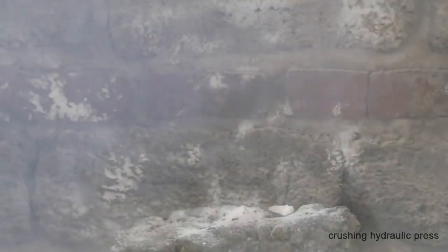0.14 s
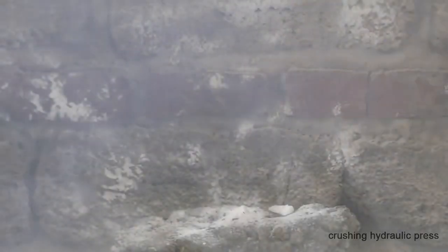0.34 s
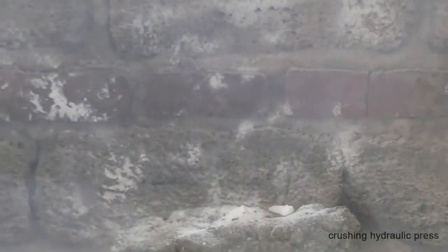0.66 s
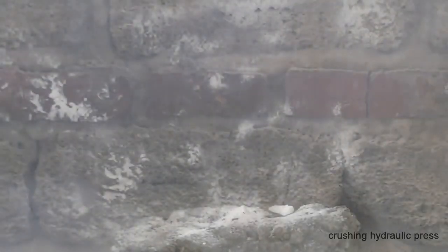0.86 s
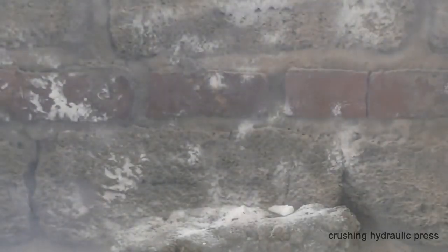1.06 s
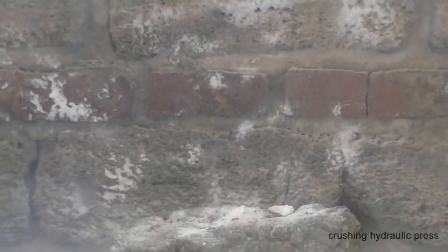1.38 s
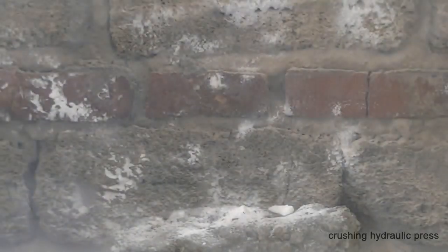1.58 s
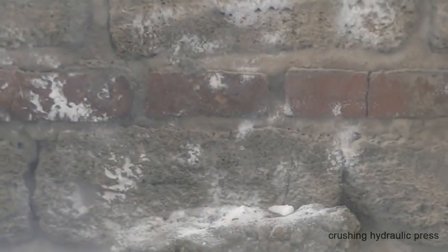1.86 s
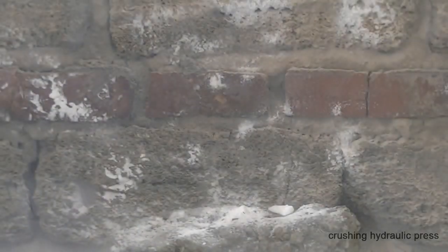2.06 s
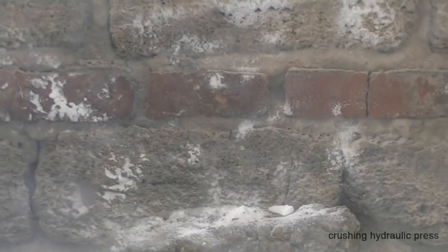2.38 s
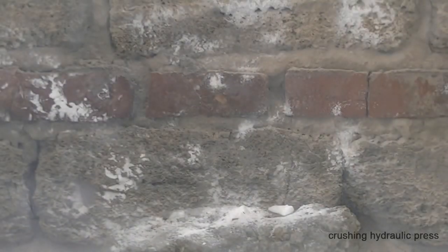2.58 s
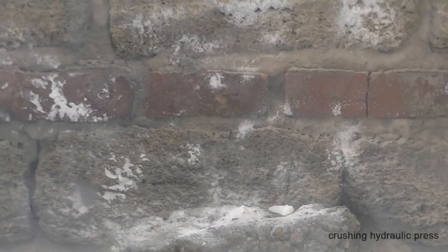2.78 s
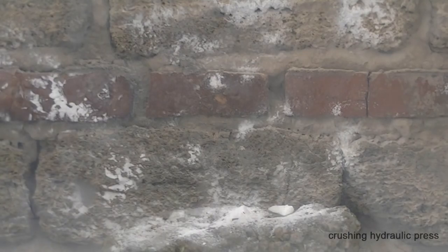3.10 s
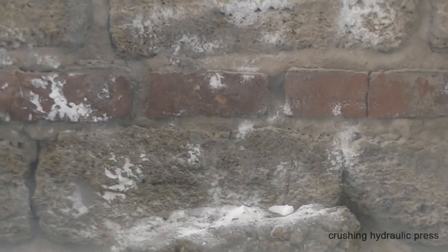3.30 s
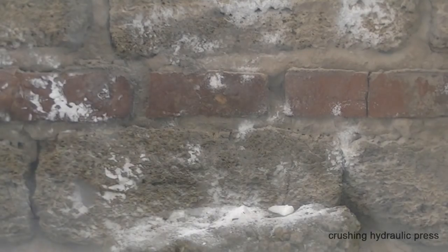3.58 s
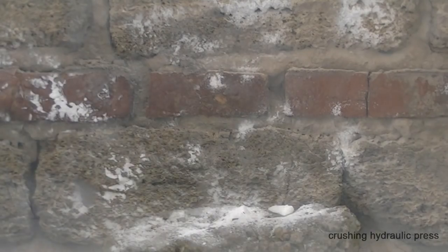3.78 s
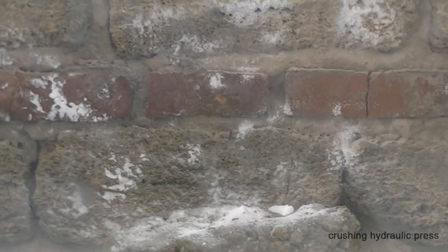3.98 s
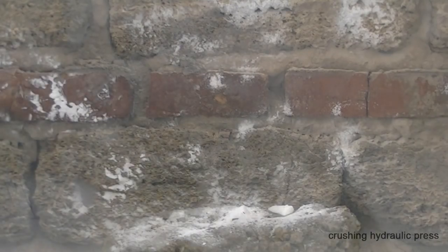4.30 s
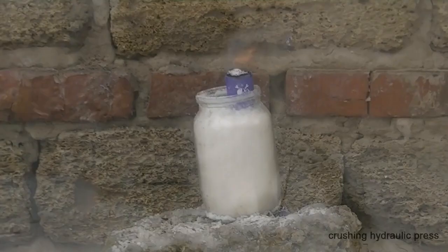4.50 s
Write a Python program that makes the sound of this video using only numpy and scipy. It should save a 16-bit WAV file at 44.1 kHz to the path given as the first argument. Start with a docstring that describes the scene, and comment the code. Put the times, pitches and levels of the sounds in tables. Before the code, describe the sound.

Outdoors beside a brick wall, close stereo pickup: a quick spray of grit and a dying echo, then bright hard shard impacts, some rattling a nearby panel, some ringing as short clinks. Fine patter thins after about a second and a half to isolated ticks. Short crunchy gravel scuffs follow, then faint, high bird pips over quiet air hush.

```python
"""Open air before a brick wall, a close pair of microphones, a firecracker having just burst a glass jar.
A steady hush of filtered noise lies under the blast's fading echo and a first spray of grit, both noise.
Grit patters as tiny decaying sines; shards land nearby as noise cracks, some set a panel ringing, and
some clink as decaying sines. The patter fades; gravel is scuffed in swells of dense grains, and last a
small bird calls far off in wavering sine pips."""
import sys
import numpy as np
from scipy import signal
from scipy.fft import rfft, irfft, next_fast_len
from scipy.io import wavfile
from scipy.ndimage import map_coordinates

SR = 44100
rng = np.random.default_rng(int(sys.argv[2]) if len(sys.argv) > 2 else 0)


def bounce(signal):
    """Save signal as a 16-bit WAV file at the path given by the first command-line argument."""
    frames = np.transpose(np.atleast_2d(signal))
    limited = np.clip(frames, -1, 1)
    pcm = np.round(limited * 32767).astype(np.int16)
    wavfile.write(sys.argv[1], SR, pcm)


N = 204934


def amp(db):
    """Decibels to gain."""
    return 10 ** (np.asarray(db) / 20)


def unit(x):
    """x scaled to rms 1."""
    return x / np.sqrt(np.mean(x ** 2) + 1e-20)


def fade(t, t60):
    """Exponential decay that loses 60 dB in t60 seconds."""
    return np.exp(-np.log(1000) * t / t60)


def dying(t, start_db, db_per_s):
    """Power of something that starts at start_db and loses db_per_s decibels each second."""
    return amp(start_db - db_per_s * t) ** 2


def add(track, s, sound):
    """Mix a sound into a track at s seconds, cut off at the track's end."""
    room = track[max(round(s * SR), 0):][:len(sound)]
    room += sound[:len(room)]


def curve(points, m):
    """Points of (f/Hz, level/dB) joined along log frequency, over the bins of an m-sample spectrum."""
    hz, db = np.transpose(points)
    return np.interp(np.log(np.fft.rfftfreq(m, 1 / SR) + 1), np.log(hz), db)


def coloured(x, points):
    """x filtered to the shape of (f/Hz, level/dB) points, then scaled to rms 1."""
    m = next_fast_len(N + SR // 4)
    return unit(irfft(rfft(x, m) * amp(curve(points, m)), m)[:N])


def noise():
    """White noise for the whole scene."""
    return rng.standard_normal(N)


def wobble(rate):
    """A smooth random curve with rate knots a second."""
    knots = rng.standard_normal(int(N * rate / SR) + 4)
    return map_coordinates(knots, [np.arange(N) * rate / SR])


def grains(count, pitch_hz, spread, cycles, scatter_db):
    """Tiny contacts at random times, each a few cycles at its own pitch and size, spread by nearby surfaces."""
    when, size = rng.random((2, count))
    hz = pitch_hz * np.exp(spread * rng.standard_normal((count, 1)))
    hz = np.clip(hz, 200, 15000)
    k = np.arange(SR // 50)
    # many small grains and a few large ones, with a ceiling
    strength = amp(scatter_db * np.minimum(-np.log(1 - size), np.pi))
    contact = np.sin(2 * np.pi * hz * k / SR) * fade(k / SR, cycles / hz)
    scatter = .4 * rng.standard_normal(contact.shape) * fade(k / SR, .02)
    rings = strength[:, None] * (contact + scatter)
    places = (when * N).astype(int)[:, None] + k
    return unit(np.bincount(places.ravel(), rings.ravel(), N)[:N])


# colour of the open-air hush at both microphones: (f/Hz, relative level/dB)
AIR_COLOUR = [(25, -34), (140, -30), (220, -23), (450, -5), (800, -7.5), (1500, -5.5), (3500, -10.5),
              (7000, -20), (14000, -31), (16000, -38.5)]


def air(level_db=-63.5):
    """The steady hush of the open air: filtered noise whose level barely moves."""
    return amp(level_db + 0.25 * wobble(15.0)) * coloured(noise(), AIR_COLOUR)


# colour of the blast's echo: (f/Hz, relative level/dB)
ECHO_COLOUR = [(60, -39), (160, -29), (300, -11.5), (450, 2.5), (800, -8), (1500, -5.5), (4000, -11),
               (12000, -55.5)]


def blast_echo():
    """The blast's echo: noise fading quickly off near walls and slowly from far away."""
    t = np.arange(N) / SR
    near = dying(t, start_db=-41, db_per_s=43.5)
    far = dying(t, start_db=-44, db_per_s=12.2)
    echo_db = 10 * np.log10(near + far)
    return amp(echo_db + 1.97 * wobble(30)) * coloured(noise(), ECHO_COLOUR)


def grit_level(t):
    """Level of the falling grit in dB: a shower thrown upwards that holds and runs out, and a trickle of dust."""
    shower_hold_s = 1.363
    shower = dying(np.maximum(t - shower_hold_s, 0), start_db=-52, db_per_s=25.5)
    trickle = dying(t, start_db=-56.5, db_per_s=4.8)
    return 10 * np.log10(shower + trickle)


# colour of grit, dust and glass chips falling: (f/Hz, relative level/dB)
GRIT_COLOUR = [(250, -42), (620, -2.5), (950, -14), (1600, -2), (4000, -3.5), (7500, -8), (11000, -17.5),
               (16000, -43)]


def grit(dust_db=-5.5, chips_db=-4, patter_db=-1):
    """A first spray of grit dies quickly as noise; grit, dust and a few glass chips patter down as grains and noise."""
    t = np.arange(N) / SR
    flurries = amp(2.5 * wobble(45))
    # the spray is too dense for single ticks
    spray = np.sqrt(dying(t, start_db=-35.5, db_per_s=170)) * coloured(flurries * noise(), GRIT_COLOUR)
    ticks = grains(count=1600, pitch_hz=3600, spread=.5, cycles=15, scatter_db=5)
    chips = grains(count=130, pitch_hz=5000, spread=.4, cycles=5, scatter_db=3)
    patter = amp(patter_db) * flurries * ticks + amp(chips_db) * chips + amp(dust_db) * noise()
    level = amp(grit_level(t) + 1.6 * wobble(35.25))
    return spray + level * coloured(patter, GRIT_COLOUR)


# where rumble, thud, knock, clack, tick, fizz and sizzle lie:
# (low f/Hz, high f/Hz, tail length as a multiple of the common one)
REGISTERS = [(32.4, 194.6, 0.61), (309.3, 900, 1.07), (1116, 2246, 0.98), (2235, 4200, 0.94),
             (4430, 7800, 0.88), (8250, 10800, 0.49), (11300, 14800, .45)]


def crack_colour(db, pitch_hz, octaves, on_panel_db):
    """Levels of thud to fizz: a hump round the piece's pitch, and a thud where it meets the ground."""
    skirt_db = 21.5  # how steeply a crack fades away from its pitch, per width
    thud_db, thud_loss = -17.5, 1.35  # thud under the crack; dB of thud lost per dB of panel
    fizz_db = -9  # the top of every crack is duller still
    centres = np.array([np.sqrt(low * high) for low, high, _ in REGISTERS[2:-1]])
    widths_away = np.log2(centres / pitch_hz) / octaves
    knock, clack, tick, fizz = db - skirt_db * (np.hypot(1, widths_away) - 1)
    return [db + thud_db - thud_loss * on_panel_db, knock, clack, tick, fizz + fizz_db]


# modes of the nearby panel: (f/Hz, level/dB before each blow's strength and chance)
PANEL_MODES = [(452, -45.5), (520, -44), (865, -37.5), (1200, -46.5), (1475, -43), (1595, -38.5),
               (1938, -59.5), (2110, -44.5), (2320, -51), (2864, -49), (2993, -45), (3054, -40),
               (3241, -44), (3499, -62), (3795, -47), (3975, -48.5), (4031, -46), (4272, -48.5),
               (4545, -55), (4829, -48), (5300, -46.5), (5605, -46.5), (6428, -62), (7181, -75),
               (7773, -58)]
# the loudest pieces to land: (t/s, level/dB at the pitch, pitch f/Hz, width of the crack's colour/octaves,
# panel level/dB before the common panel level: high = on the panel, low = on the ground)
LANDINGS = [(0.033, -41, 2400, 1.9, 7), (0.0408, -19.5, 1510, 1, -4), (0.0549, -42.5, 2000, 3.6, -19.5),
            (.091, -40.5, 4300, 3.7, -4), (.122, -26.5, 1780, 1.77, -3), (.1322, -23, 2270, 0.95, -4),
            (0.3508, -28.5, 1970, 1.47, -9), (0.3623, -45.5, 2830, 2.5, 3), (0.389, -28, 5100, 1.56, 2.5),
            (0.4186, -21.5, 3960, 1.25, -5.5), (.423, -34, 3200, 1.1, 18), (.534, -46.5, 2950, 1.8, 2),
            (0.562, -41, 2400, 1.8, 1), (.586, -22.5, 1940, 1.06, -6), (0.5983, -33, 1400, 1.94, -10.5),
            (.6277, -45, 4660, 3.5, -6.5), (0.7093, -24, 4260, 1.6, 3), (0.7229, -30.5, 3600, 1.5, 0.5),
            (0.7364, -25, 3800, 0.89, 0.5), (0.8086, -21.5, 4460, 1.8, 2.5), (0.92, -53, 7000, 1.6, -7),
            (0.9502, -56, 3600, 1.45, 16.5), (1.018, -42, 3020, 1.35, 5), (1.107, -48, 3780, 1.7, 1),
            (1.1547, -49, 4070, 0.9, 1), (1.1937, -46.5, 2470, 2.6, 11), (1.2027, -34, 3300, 1.17, -1),
            (1.2784, -40, 3650, 1.3, -4), (1.353, -47, 3500, 0.95, -2.5), (1.3829, -43.5, 4100, 2.2, -0.5),
            (1.6287, -47, 3800, 1.24, -8.5), (1.6998, -43, 3320, 1.85, 0), (1.768, -48.5, 2080, 0.78, -1),
            (1.861, -45.5, 3300, 1.1, -2.5), (1.9513, -55, 4470, 1.1, 1.5),
            (2.0399, -45.5, 2860, 1.32, -8.5), (2.0619, -52.5, 3000, 1.8, -6),
            (2.1139, -56.5, 3890, 3.7, -2), (2.1965, -40, 2370, 0.56, 0), (2.2047, -45.5, 3500, 0.88, -3),
            (2.3504, -56, 4880, 2.7, -6), (2.3726, -56.5, 4150, 1.3, 3.5),
            (2.6941, -39.5, 2900, 0.97, -9.5), (2.8013, -40.5, 1470, 1.02, -5),
            (2.8587, -37, 2400, 0.69, -4), (3.206, -47.5, 1670, 1.05, 0.5),
            (3.2626, -36.5, 2230, 0.53, -2.5), (3.3275, -43, 1280, 0.66, -4), (3.546, -57, 1410, 3.5, 2.5),
            (3.8316, -56, 2520, 0.85, 3), (4.0832, -55.5, 2620, 1, -3), (4.0952, -47.5, 1370, 1.1, 2),
            (4.581, -42.5, 1600, 0.82, -10)]


def landings(crack_t60=0.018, rise=0.00022, wall_db=-13.5, wall_t60=0.023, panel_db=-2, panel_t60=0.12,
             rumble_db=-34, sizzle_db=-11, clarity=0.11):
    """Each piece gives a short crack, scatter from wall and ground, and a ring of the panel, in its own colour."""
    track, t = np.zeros(N), np.arange(SR // 5) / SR
    bands = []
    for *edges, life in REGISTERS:
        edges = np.clip(edges, 20, SR * .48)
        bands.append((signal.butter(4, edges, "bandpass", fs=SR, output="sos"), life))
    mode_hz, mode_db = np.transpose(PANEL_MODES)
    contact = t < .006  # the stretch over which a crack's level is set
    onset = 1 - np.exp(-t / rise)
    build = 1 - np.exp(-t / 0.0037)  # reflections and ring take a moment to gather
    rattling = amp(-35 + 3 * wobble(350))
    hardest_db = max(row[1] for row in LANDINGS)
    for s, piece_db, pitch_hz, octaves, ring_db in LANDINGS:
        colour_db = crack_colour(piece_db, pitch_hz, octaves, ring_db)
        crack, scatter, rattle = rng.standard_normal((3, len(t)))
        # hard blows bring out the clear modes; the many weak ones merge into a rattle
        chance_db = 5.0 * rng.standard_normal(len(mode_hz))
        strengths = amp(mode_db + clarity * (piece_db - hardest_db) + chance_db)
        phases = 2 * np.pi * rng.random((len(mode_hz), 1))
        modes = strengths @ np.sin(2 * np.pi * mode_hz[:, None] * t + phases)
        ring = modes + rattle * np.roll(rattling, -round(s * SR))[:len(t)]
        parts = np.array([crack * onset * fade(t, crack_t60), scatter, ring])
        # the outer registers follow their neighbours
        levels = [colour_db[0] + rumble_db, *colour_db, colour_db[-1] + sizzle_db]
        for (band, life), db in zip(bands, levels):
            blow, wall, panel = signal.sosfilt(band, parts)
            blow = blow / np.linalg.norm(blow) * np.sqrt(contact.sum())
            wall = amp(wall_db) * unit(wall) * fade(t, life * wall_t60)
            panel = amp(panel_db + ring_db) * unit(panel) * fade(t, life * panel_t60)
            add(track, s, amp(db) * (blow + build * (wall + panel)))
    return track


# pieces that sound one clear pitch, their own or a mode of the panel:
# (t/s, peak level/dB before decay, onset and bass cut, f/Hz, t60/s)
CLINKS = [(.106, -26, 2140, 0.0088), (0.235, -40.5, 4000, 0.059), (0.255, -33.5, 3160, 0.02),
          (0.3899, 5.5, 5600, 0.0022), (.426, -25, 486, .14), (0.8104, -18.5, 2845, 0.11),
          (0.891, -38, 900, 0.024), (0.978, -34.5, 4050, 0.017), (1.123, -32, 3680, 0.015),
          (1.4576, -38, 3150, 0.021), (1.7922, -31.5, 3320, 0.016), (2.02, -39.5, 2380, 0.012),
          (2.6965, -33, 642, 0.03), (2.8605, -25, 3740, 0.0069), (3.2642, -26, 2130, 0.012),
          (3.473, -44, 485, 0.14), (3.8315, -38, 3263, 0.024), (4.096, -39, 1597, 0.078),
          (4.096, -43.5, 853, 0.1), (4.5798, -36.5, 2920, 0.02)]


def clinks():
    """A piece rings briefly at one pitch, unsteadily as it rocks; it is too small to radiate bass."""
    track, t = np.zeros(N), np.arange(SR // 5) / SR
    rocking = .55 * wobble(220)  # phase, radians
    for s, db, hz, t60 in CLINKS:
        phase = 2 * np.pi * hz * t + np.roll(rocking, -round(s * SR))[:len(t)]
        onset = 1 - np.exp(-t / .0001)
        add(track, s, amp(db) * np.sin(phase) * fade(t, t60) * onset)
    bass_cut = signal.butter(4, 330, "highpass", fs=SR, output="sos")
    return signal.sosfilt(bass_cut, track)


# colour of gravel: (f/Hz, relative level/dB)
GRAVEL_COLOUR = [(100, -57), (230, -21), (430, 0.5), (850, -10.5), (1500, 1), (3000, -8), (5000, -16.5),
                 (10000, -26), (15000, -60)]
# scuffs on gravel: (middle t/s, half length t/s where power is down to 1/e, level/dB at the middle)
SCUFFS = [(2.438, 0.016, -61.5), (2.942, 0.03, -44.5), (3.038, 0.019, -47.5), (3.124, 0.076, -59.5),
          (3.2, 0.025, -51.5), (3.364, 0.14, -58.5), (3.567, 0.04, -52.5), (3.649, 0.019, -57.5),
          (3.717, 0.021, -61), (4.51, 0.022, -57.5)]


def scuffs(rub_db=-3, catch_db=1):
    """Gravel grinds in short swells of dense grains and rubbing noise."""
    t = np.arange(N) / SR
    power = sum(amp(db) ** 2 * np.exp(-((t - s) / half) ** 2) for s, half, db in SCUFFS)
    stones = grains(count=3200, pitch_hz=2200, spread=.8, cycles=8, scatter_db=3)
    grinding = coloured(stones + amp(rub_db) * noise(), GRAVEL_COLOUR)
    return np.sqrt(power) * amp(catch_db * wobble(70)) * grinding


# notes of the far-off bird: (middle t/s, f/Hz before wavering, rms level/dB at the middle)
BIRD_NOTES = [(3.89, 3210, -57), (3.92, 4030, -66), (3.935, 3220, -56.5), (3.959, 4030, -70),
              (4.043, 4050, -64), (4.12, 4090, -66), (4.16, 4090, -69), (4.24, 4130, -65.5),
              (4.323, 4090, -68), (4.363, 3200, -59.5), (4.635, 4100, -65)]


def bird(waver=0.0082, half_s=0.0079):
    """Faint sine pips round two pitches, wavering because they share an unsteady clock."""
    t = np.arange(N) / SR
    clock = np.cumsum(1 + waver * wobble(120)) / SR
    track = np.zeros(N)
    for s, hz, db in BIRD_NOTES:
        swell = np.exp(-.5 * ((t - s) / half_s) ** 2)
        track += np.sqrt(2) * amp(db) * swell * np.sin(2 * np.pi * hz * clock)
    return track


# most side against mid, before the phase turn scales it: (f/Hz, level/dB)
STEREO_WIDTH = [(60, -10.5), (200, -15), (330, -27.5), (520, -30), (700, -17), (860, -4.5), (1100, -18.5),
                (2000, -18.5), (3800, -14), (7000, -13), (10000, -20), (15000, -24.5)]
# colour of the hush that differs between the microphones: (f/Hz, relative level/dB)
AIR_SIDE_COLOUR = [(25, -23.5), (140, -25), (300, -9), (600, 0.5), (850, -1.5), (1500, -1.5), (3500, -7.5),
                   (6500, -20.5), (10000, -34.5), (16000, -51.5)]


def scene(side_db=0, air_side_db=-72):
    """Two close microphones hear the same source levels; reflections turn the phase between them by frequency."""
    mid = air() + blast_echo() + grit() + landings() + clinks() + scuffs() + bird()
    m = next_fast_len(N + SR // 4)
    spectrum = rfft(mid, m)
    knots = rng.standard_normal(size=80)
    turn = np.tanh(3 * map_coordinates(knots, [np.linspace(0, 79, len(spectrum))]))
    width = amp(side_db + curve(STEREO_WIDTH, m))
    # a quarter turn (1j) leaves both channels equally loud
    reflected = irfft(1j * width * turn * spectrum, m)[:N]
    side = reflected + amp(air_side_db) * coloured(noise(), AIR_SIDE_COLOUR)
    return np.array([mid + side, mid - side])


def record(dry, top_hz=16200):
    """The microphones' feed keeps nothing at or above its band limit, top_hz."""
    m = next_fast_len(N + SR // 4)
    kept = np.fft.rfftfreq(m, 1 / SR) < top_hz
    return irfft(rfft(dry, m) * kept, m)[:, :N]


dry = scene()
out = record(dry)
bounce(out)
```